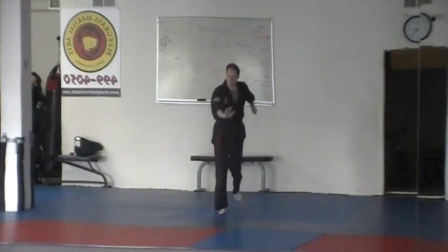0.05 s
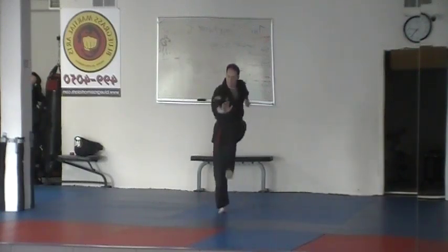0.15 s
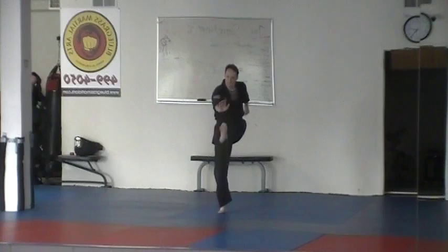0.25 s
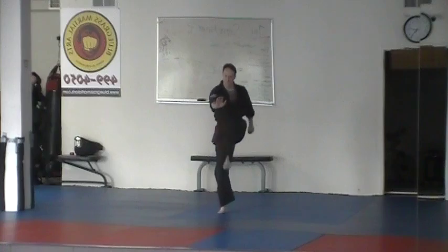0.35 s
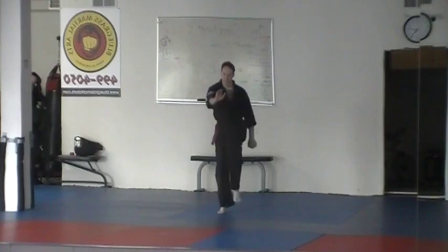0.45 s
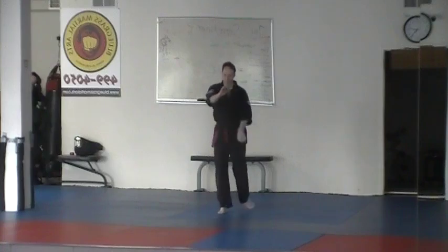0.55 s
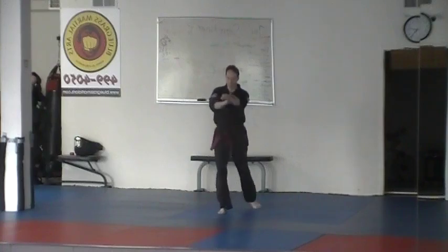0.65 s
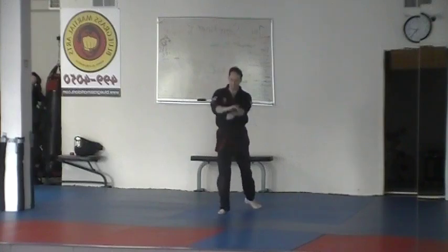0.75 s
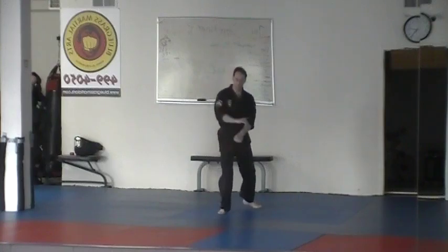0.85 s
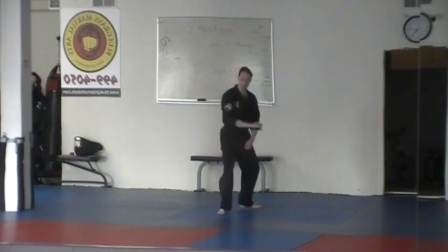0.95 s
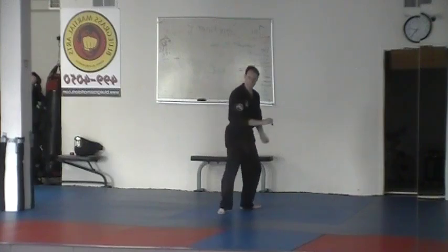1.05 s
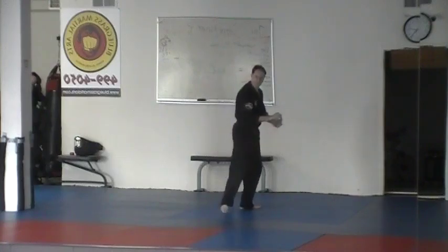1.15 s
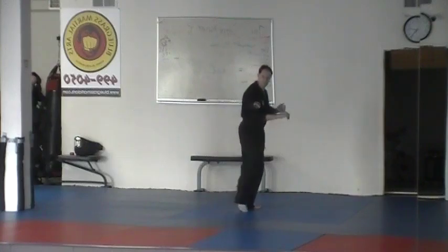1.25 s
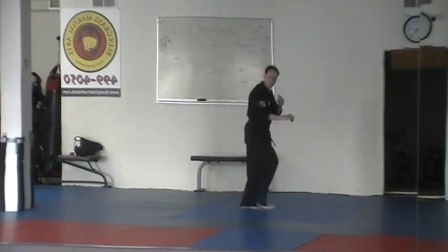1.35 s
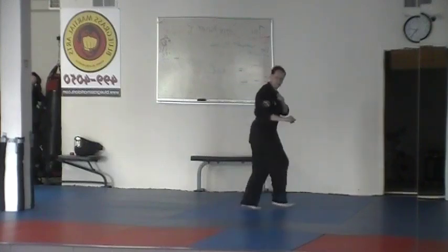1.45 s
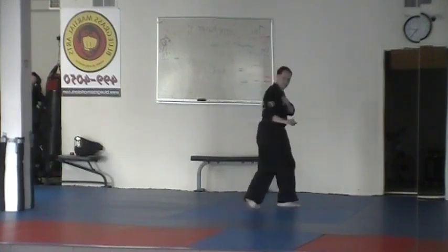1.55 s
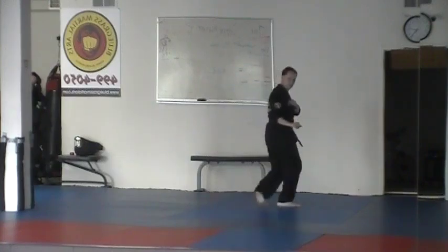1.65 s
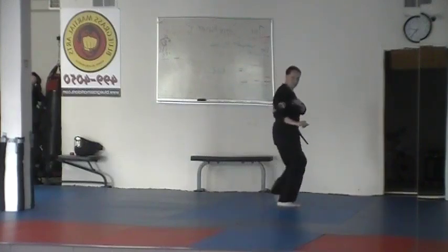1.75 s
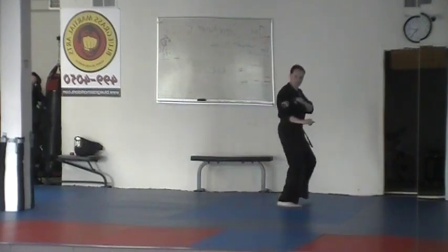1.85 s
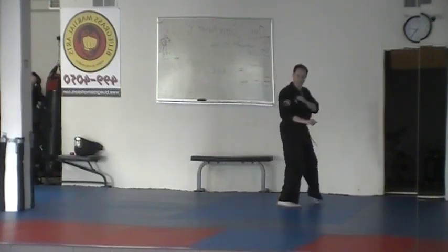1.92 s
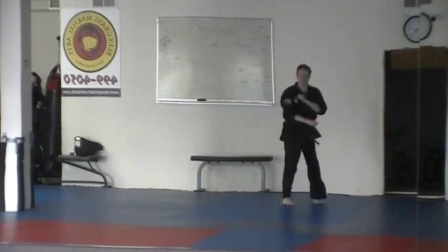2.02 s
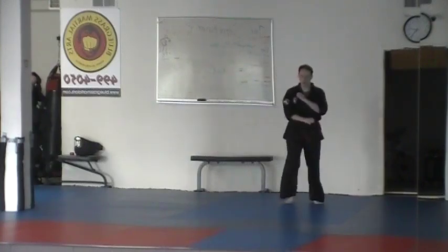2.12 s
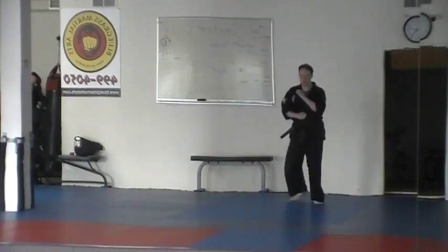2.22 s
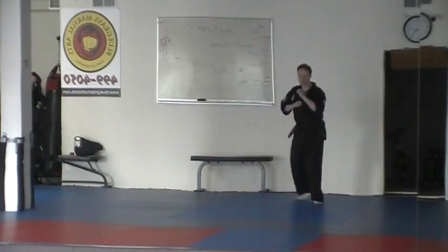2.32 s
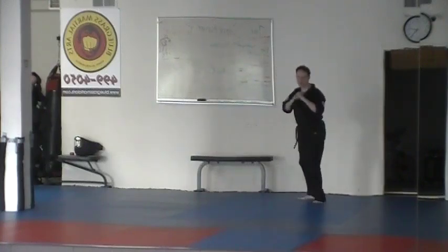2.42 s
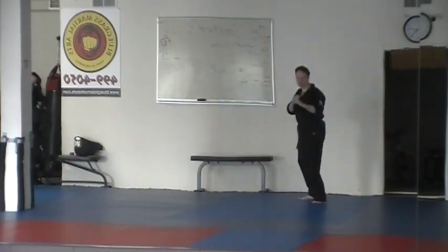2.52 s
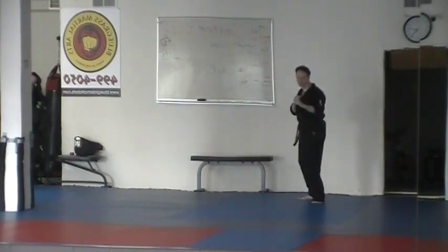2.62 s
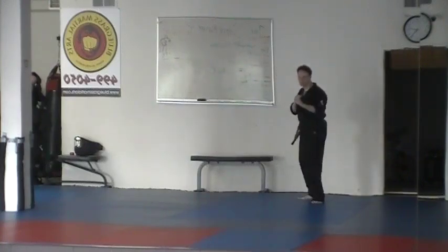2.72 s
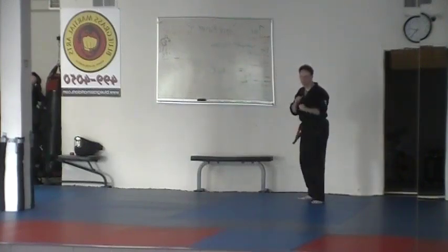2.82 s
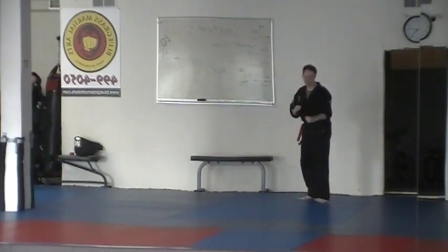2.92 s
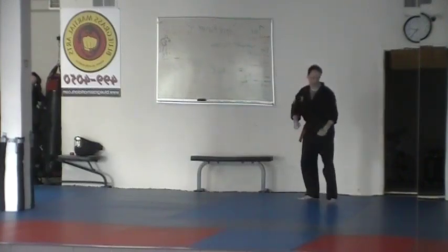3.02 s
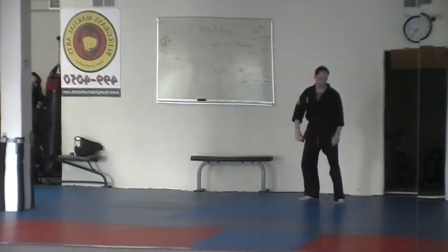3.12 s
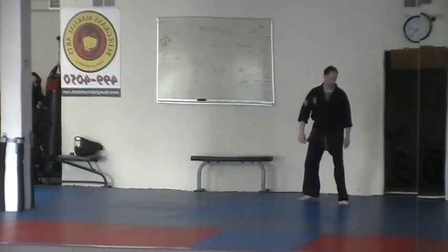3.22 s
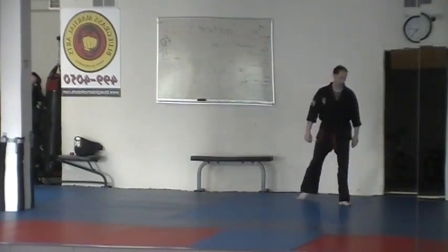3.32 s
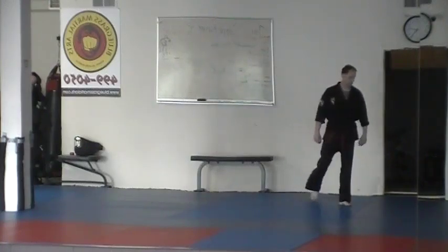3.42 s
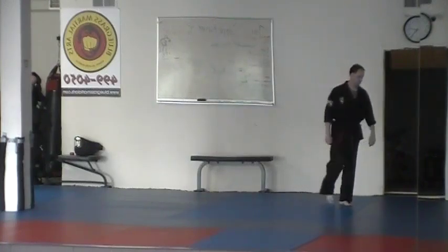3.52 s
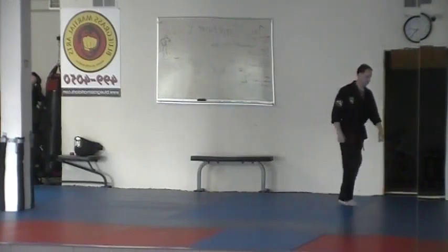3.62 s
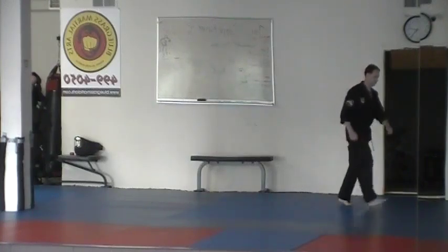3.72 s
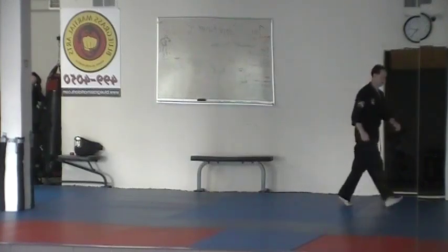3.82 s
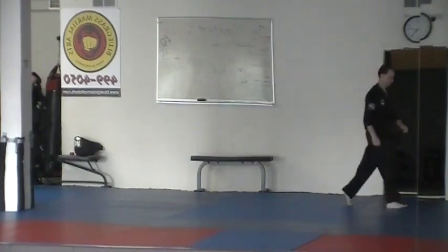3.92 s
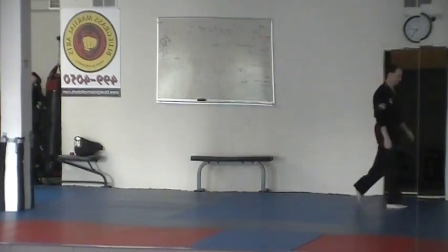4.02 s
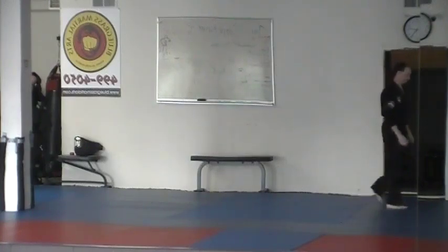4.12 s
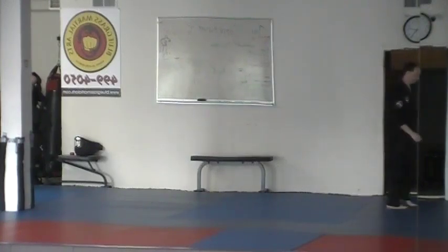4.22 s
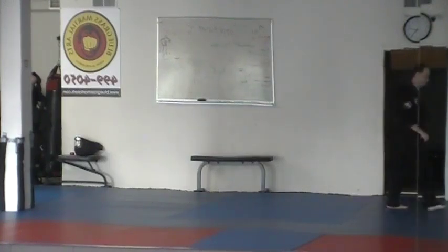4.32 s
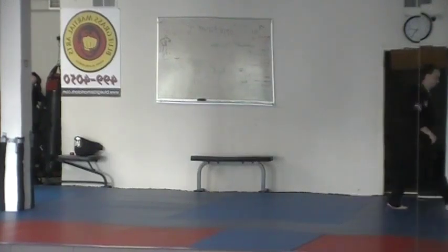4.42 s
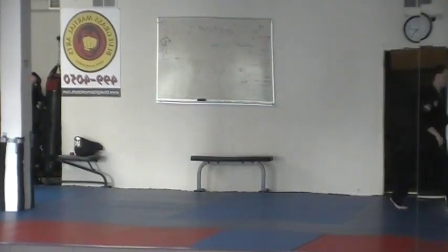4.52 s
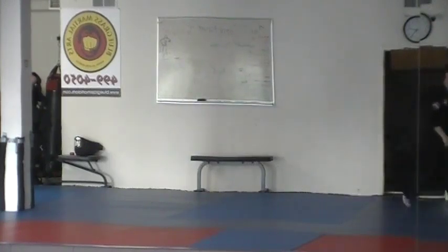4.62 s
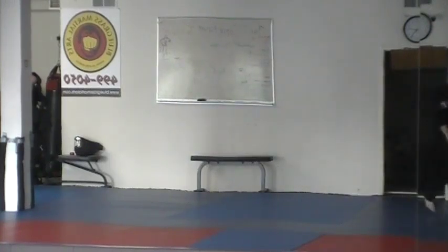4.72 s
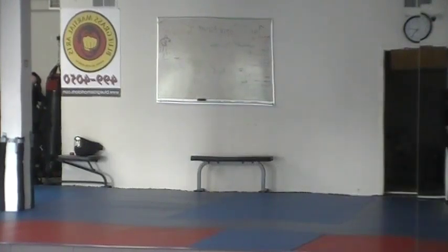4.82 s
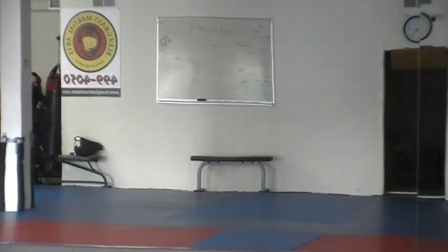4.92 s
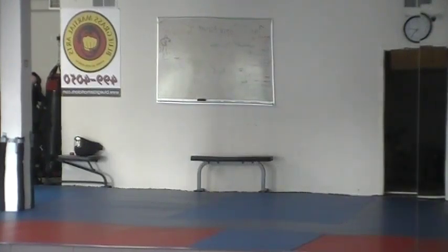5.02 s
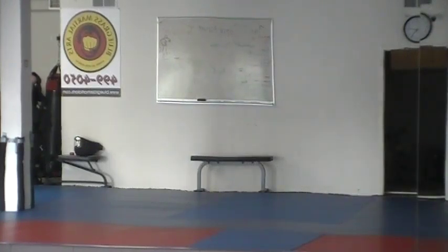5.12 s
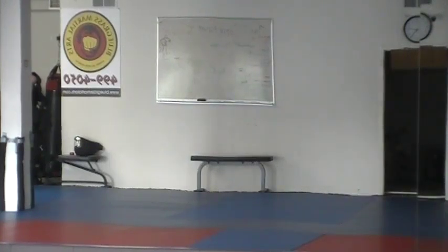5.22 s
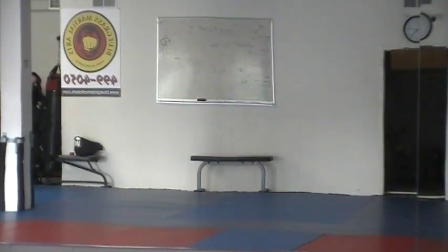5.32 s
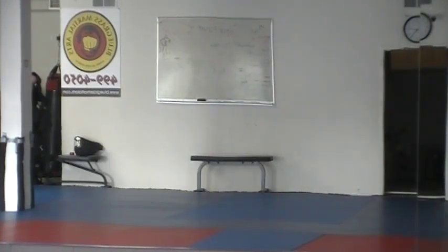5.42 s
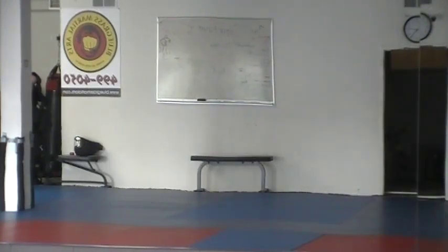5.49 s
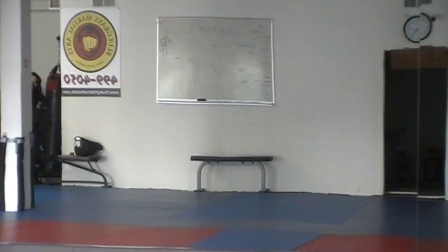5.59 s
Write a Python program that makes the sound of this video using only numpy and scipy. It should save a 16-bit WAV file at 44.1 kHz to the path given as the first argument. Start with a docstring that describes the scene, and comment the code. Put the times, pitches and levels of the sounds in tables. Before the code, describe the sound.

In a slightly echoing training hall with humming ventilation, cloth swishes softly before a single bright slap, by far the loudest sound, makes the microphone level duck for a moment. Two hissing slides follow as bare feet turn on a foam mat, the first with a sleeve snap and a tiny squeak. After that come only faint, scattered scuffs, ticks and soft pats of someone walking off.

```python
"""Barefoot martial arts drill

In a hard-walled hall with humming ventilation, a cotton uniform rustles through a kick and one sharp
slap cracks. Bare soles hiss round in two pivots on a vinyl-covered foam mat, then light steps scuff and
pat away. Automatic gain control turns everything down for a moment after the slap."""
import sys
import numpy as np
from scipy import signal
from scipy.fft import rfft, irfft
from scipy.io import wavfile
from scipy.ndimage import uniform_filter1d, minimum_filter1d

SR = 44100
rng = np.random.default_rng(int(sys.argv[2]) if len(sys.argv) > 2 else 0)


def inscribe(sig):
    """Save sig as 16-bit PCM at rate SR to the path in sys.argv[1].

    A 1-D sig is mono; a 2-D sig holds one channel per row.
    Samples are clipped to [-1, 1] before scaling.
    """
    pcm = np.round(np.clip(np.atleast_2d(sig).T, -1, 1) * 32767)
    wavfile.write(sys.argv[1], SR, pcm.astype(np.int16))


N = 249284

# the fine hiss of skin sliding on vinyl: (frequency [Hz], level [dB])
HISS_SPECTRUM = [(100, -62), (1000, -38), (3000, -16.5), (5500, -12), (7000, -7), (8600, -2), (10200, 0),
                 (12000, -3), (13500, -8.5), (15700, -17.5)]
# the lower, rougher sound of hard rubbing: (frequency [Hz], level [dB])
RASP_SPECTRUM = [(40, -48), (150, -33), (400, -3.5), (900, -10.5), (1500, -1), (2200, 2), (3500, 1.5),
                 (5000, 2), (8000, -3.5), (16000, -39)]
# the dull pat of the foam mat: (frequency [multiple of its pitch], level [dB])
MAT_SPECTRUM = [(.15, -33.5), (.45, -19.5), (.75, -5), (1, 4), (1.3, -3), (1.9, -19), (3.5, -9.5), (7, -29),
                (30, -66)]
# feet landing on the mat: (time [s], relative pat level [dB], pat pitch [Hz], skid level [dB])
LANDINGS = [(.111, -41, 686, -61), (.213, -44, 483, -46.5), (1.922, -45.5, 373, -45),
            (3.349, -48.5, 387, -53), (3.872, -51.5, 375, -57), (3.905, -44.5, 402, -45),
            (4.521, -45, 404, -49), (4.561, -44.5, 690, -54), (5.094, -41, 480, -46)]


def amp(db):
    """Turn decibels into a factor to multiply by."""
    return 10 ** (np.asarray(db) / 20)


def unit(x):
    """Scale a signal to an average power of 1."""
    return x / np.sqrt(np.mean(x ** 2) + 1e-20)


def value_at(points, hz):
    """Look up a table's value at hz, on a log-frequency axis."""
    freqs, values = np.transpose(points)
    return np.interp(np.log(hz + 1), np.log(freqs + 1), values)


def add(mix, start_s, sound):
    """Mix a sound in at its start time."""
    part = mix[max(round(start_s * SR), 0):][:len(sound)]
    part += sound[:len(part)]


def colour(x, spectrum, tilt_db=0, size=2048):
    """Give x the tone of a spectrum, tilted by tilt_db per octave; the filter has an energy of 1."""
    hz = abs(np.fft.fftfreq(size, 1 / SR))
    log_gain = np.log(amp(value_at(spectrum, hz) + tilt_db * np.log2(hz + 1)))
    ring = np.fft.ifft(np.exp(np.conj(signal.hilbert(log_gain)))).real  # rings after a hit, not before
    return signal.fftconvolve(x, ring / np.linalg.norm(ring))[:N]


def drift(n, hz):
    """A random wobble of about size 1 that turns hz times a second."""
    position = np.arange(n) * hz / SR
    return np.interp(position, np.arange(N // 10), rng.standard_normal(N // 10))


def grains(n, per_s, spread_db):
    """Rubbing surfaces catch and let go, making tiny clicks of uneven size."""
    chance, size, sign = rng.random(n), rng.standard_normal(n), rng.choice([-1, 1], n)
    return unit((chance < per_s / SR) * sign * amp(spread_db * np.clip(size, -2, 2)))


def burst(length_s, passes=6):
    """A brief contact: noise with its energy spread evenly over all frequencies."""
    window = signal.windows.tukey(max(round(length_s * SR), 10), .4)
    noise = rng.standard_normal(len(window))
    for _ in range(passes):
        phases = np.angle(rfft(noise * window, 2 * len(noise)))
        noise = irfft(np.exp(1j * phases))[:len(noise)]
    return unit(noise * window)


def sweep(length_s, swell_db, peak_s, fade_db_per_s, contact_s=.0098, release_share=.23):
    """The loudness of one limb movement: it starts quickly, swells to a peak, fades and lets go."""
    t = np.arange(0, length_s, 1 / SR)
    db = -swell_db * np.maximum(1 - t / peak_s, 0) - fade_db_per_s * np.maximum(t - peak_s, 0)
    return amp(db) * np.minimum(t / contact_s, 1) * np.minimum((1 - t / length_s) / release_share, 1)


def rub(strokes, rasp_tilt_db=0):
    """Short rubs on the mat, part hiss and part rasp, that catch quickly and let go."""
    hiss, rasp = np.zeros((2, N))
    for start, db, length, rasp_share in strokes:
        n = round(length * SR)
        loudness = amp(db) * np.interp(np.linspace(0, 1, n), [0, .08, .7, 1], [.83, .87, .67, .41])
        add(hiss, start, np.sqrt(1 - rasp_share) * loudness * grains(n, per_s=12000, spread_db=5.3))
        add(rasp, start, np.sqrt(rasp_share) * loudness * grains(n, per_s=2500, spread_db=5.4))
    return colour(hiss, HISS_SPECTRUM) + colour(rasp, RASP_SPECTRUM, rasp_tilt_db)


def ventilation(air_db=-56.5, waver_db=2.0, wander_radians=.52):
    """Air rushes steadily while a motor hums with slightly wavering tones."""
    # moving air: (frequency [Hz], relative level [dB])
    air_spectrum = [(25, -32), (70, -26), (125, -15.5), (160, -14), (230, -5.5), (400, 0), (900, -1.5),
                    (1900, -4), (3000, -8), (5000, -11.5), (9500, -11), (15500, -19)]
    # the motor's tones: (frequency [Hz], level [dB])
    motor_tones = [(120, -85.5), (199, -81), (220, -81.5), (241, -74), (398.4, -69), (479, -74),
                   (792, -77.5), (844, -72.5), (963.6, -70.5), (1320, -75)]
    t = np.arange(N) / SR
    hum = np.zeros(N)
    for hz, db in motor_tones:
        height = np.sqrt(2) * amp(db + waver_db * drift(N, hz=3.06))
        hum += height * np.sin(2 * np.pi * hz * t + wander_radians * drift(N, hz=3.95))
    return amp(air_db) * colour(rng.standard_normal(N), air_spectrum) + hum


def hall(x, echo_db, floor_db, floor_delay_s=.003, far_walls_s=.03, early_db=-8):
    """Sound arrives directly, off the floor, then as echoes that thicken once the far walls answer."""
    # first echoes off the ceiling, walls and gear: (delay [s], relative level [dB], length [s])
    first_echoes = [(.0032, -13, 0.00065), (.009, -11.5, 0.0021), (.011, -17, 0.0043),
                    (.016, -15.5, 0.0045), (.025, -30, .005), (0.035, -19, .008)]
    # how the hall rings: (frequency [Hz], time to fade by 60 dB [s], relative level [dB])
    hall_bands = [(150, 0.57, -7), (499, 0.43, -2), (1210, 0.65, -3.5), (3200, 0.67, 1), (4850, 0.7, -1),
                  (7100, 0.65, 1), (11000, 0.52, 1), (15900, .38, 1.5)]
    t = np.arange(SR) / SR
    hz, frame_s, noise_bands = signal.stft(rng.standard_normal(SR), SR, nperseg=256)
    fade_s = value_at([(f, seconds) for f, seconds, _ in hall_bands], hz)[:, None]
    tail = signal.istft(noise_bands * amp(-60 * frame_s / fade_s), SR, nperseg=256)[1][:SR]
    tail *= amp(early_db * (t < far_walls_s)) * (t > floor_delay_s)
    walls = amp(echo_db) * tail / np.linalg.norm(tail)
    for delay, db, length in first_echoes:
        scatter = burst(length)
        add(walls, delay, amp(db) * scatter / np.linalg.norm(scatter))
    response = colour(walls, [(f, db) for f, _, db in hall_bands])  # mats and walls soak up the lows
    response[0] += 1  # the direct sound
    add(response, floor_delay_s, amp([floor_db]))
    return signal.fftconvolve(x, response)[:N]


def uniform_rustle(gain_db=-5, flap_db=.5):
    """Folds of heavy cotton buckle in clumps as the limbs swing."""
    # limb swings: (time [s], length [s], swell [dB], relative level [dB], peak after [s])
    swings = [(0, 0.29, -4, -43.5, 0.016), (.2, 0.17, -5, -47, .015), (.47, 0.21, 3, -50, 0.19),
              (1.32, 0.18, 2, -43, 0.05)]
    # rustling cotton: (frequency [Hz], level [dB])
    cotton_spectrum = [(40, -56), (100, -26), (250, -9), (480, -0.5), (750, -2), (1200, -2.5), (2200, -6),
                       (4000, -15.5), (10000, -8.5), (16000, -23)]
    out = np.zeros(N)
    for start, length, swell_db, db, peak_s in swings:
        swing = sweep(length, swell_db, peak_s, fade_db_per_s=29)
        n = len(swing)
        flapping = amp(db + gain_db + flap_db * drift(n, hz=90))
        add(out, start, swing * flapping * grains(n, per_s=4000, spread_db=5.7))
    return colour(out, cotton_spectrum)


def sleeve_snaps():
    """A loose sleeve is jerked tight at the end of a strike and cracks."""
    # cracks of the sleeve: (time [s], level [dB])
    snaps = [(1.3714, -32), (1.3776, -34)]
    out = np.zeros(N)
    for start, db in snaps:
        add(out, start, amp(db) * burst(length_s=.004))
    return colour(out, RASP_SPECTRUM, tilt_db=-2)


def foot_pats(gain_db=-2, pat_s=.015):
    """A foot presses into the foam with a soft pat, lower for a flatter foot."""
    out = np.zeros(N)
    for time, db, hz, _ in LANDINGS:
        push = burst(pat_s)
        push *= amp(db + gain_db) * np.exp(-np.linspace(0, 1, len(push)))
        pat = colour(push, np.array(MAT_SPECTRUM) * [hz, 1])
        add(out, time - pat_s / 6, pat)  # each pat begins a moment before its listed time
    return out


def landing_skids(length_s=.016, rasp_share=.39):
    """Each landing foot skids a little as it settles."""
    return rub([(start, db, length_s, rasp_share) for start, _, _, db in LANDINGS])


def scuffs():
    """Skin and hem brush briefly against the mat."""
    # light touches: (time [s], level [dB], length [s], share of rasp [0-1])
    touches = [(.002, -49, .03, 0.16), (.632, -44.5, .038, 0.35), (1.1535, -45, 0.0064, 0.13),
               (1.184, -41.5, 0.024, 0.3), (2.131, -18, .0081, .04), (2.872, -58, 0.022, 0.3),
               (2.929, -50.5, .016, 0), (3.842, -41.5, .0044, 0.23), (4.2195, -47, 0.0077, .45)]
    return rub(touches)


def strides(rasp_share=.29, repeat_lag_s=.0445, repeat_db=-5):
    """A walking sole skims the mat; a fainter hiss follows about 45 ms later, like a far-wall echo."""
    # skims of the sole: (time [s], level [dB], length [s])
    skims = [(4.271, -36.5, .028), (4.916, -34, 0.033), (5.4574, -36, 0.0093)]
    soles = [(start, db, length, rasp_share) for start, db, length in skims]
    repeats = [(start + repeat_lag_s, db + repeat_db, length, 0) for start, db, length in skims]
    return rub(soles + repeats, rasp_tilt_db=1.5)


def skin_ticks():
    """Bare skin ticks dryly and brightly on the vinyl, mostly as a foot lands."""
    # ticks of the sole: (time [s], level [dB], tilt towards the treble [dB per octave])
    ticks = [(2.419, -37, -1), (3.227, -48, -4), (4.5225, -35, -3), (4.563, -39, 5), (5.0874, -35.5, -2),
             (5.0965, -30, 0.5)]
    # skin ticking on vinyl: (frequency [Hz], level [dB])
    tick_spectrum = [(20, -67), (100, -31), (500, -4), (2200, 1.5), (6000, -1.5), (11000, 4), (16000, -22)]
    out = np.zeros(N)
    for start, db, tilt_db in ticks:
        add(out, start, colour(amp(db) * burst(length_s=.0016), tick_spectrum, tilt_db))
    return out


def squeaks(overtone_db=-7, pitch_wobble=.068):
    """Skin sticks and slips on the vinyl so regularly that it makes a tiny, unsteady tone."""
    # squeaks of the sole: (time [s], level [dB], length [s], pitch [Hz])
    chirps = [(0.081, -52.5, .012, 2200), (0.099, -52, 0.012, 2020), (1.634, -42.5, 0.017, 2158),
              (1.651, -50.5, 0.017, 3080), (3.53, -56, 0.053, 5500), (4.194, -51, .013, 938)]
    out = np.zeros(N)
    for start, db, length, hz in chirps:
        n = round(length * SR)
        pitch = hz * (1 + pitch_wobble * drift(n, hz=815))
        phase = 2 * np.pi * np.cumsum(pitch) / SR
        tone = np.sin(phase) + amp(overtone_db) * np.sin(2 * phase)
        add(out, start, amp(db) * unit(np.hanning(n) * tone))
    return out


def foam_twist(gain_db=-3, pitch_hz=410):
    """The standing foot drags the foam round in small jerks."""
    # turns of the foot: (time [s], length [s], swell [dB], relative level [dB], peak after [s])
    turns = [(1.031, 0.35, 13, -49.5, 0.28), (1.459, 0.13, 10, -52.5, 0.078),
             (2.297, 0.082, 0, -45.5, .015)]
    out = np.zeros(N)
    for start, length, swell_db, db, peak_s in turns:
        turn = sweep(length, swell_db, peak_s, fade_db_per_s=90)
        add(out, start, amp(db + gain_db) * turn * grains(len(turn), per_s=1500, spread_db=1.7))
    return colour(out, np.array(MAT_SPECTRUM) * [pitch_hz, 1])


def braking_stutter(start_s=1.615, every_s=.0245, slip_s=.016, first_db=-36, fade_db=1.7, rasp_share=.44):
    """As the first pivot ends, the sole catches and slips four times, each weaker than the last."""
    return rub([(start_s + k * every_s, first_db - k * fade_db, slip_s, rasp_share) for k in range(4)])


def sole_slides(hiss_gain_db=-2, rasp_gain_db=-4, judder_db=1.27):
    """Skin skates over the grain of the vinyl: speed makes it hiss, weight makes it rasp lower."""
    # sliding soles: (time [s], length [s], swell [dB], relative hiss level [dB], fastest after [s],
    # relative rasp level [dB], heaviest after [s], rasp tilt [dB per octave])
    slides = [(1.149, 0.5, 22, -25, 0.14, -34, .21, -1.2),
              (1.953, 0.092, 11.5, -40, 0.075, -48, 0.063, -3.5),
              (2.042, 0.18, 3, -23, 0.18, -31, 0.069, 1.8), (2.312, .1, 1, -37, 0.016, -42, .015, -0.5),
              (3.351, 0.12, 9, -43.5, 0.032, -49, 0.026, -2),
              (3.515, 0.078, 5, -45.5, 0.057, -50, .045, 3.5)]
    hiss, rasp = np.zeros((2, N))
    for start, length, swell_db, hiss_db, fastest_s, rasp_db, heaviest_s, tilt_db in slides:
        speed = sweep(length, swell_db, fastest_s, fade_db_per_s=54.5)
        weight = sweep(length, swell_db, heaviest_s, fade_db_per_s=96)
        n = len(speed)
        grip = amp(judder_db * drift(n, hz=200))
        fine = speed * grip * grains(n, per_s=12000, spread_db=4.3)
        coarse = weight * grip * grains(n, per_s=3000, spread_db=4.3)
        add(hiss, start, amp(hiss_db + hiss_gain_db) * fine)
        add(rasp, start, amp(rasp_db + rasp_gain_db) * colour(coarse, RASP_SPECTRUM, tilt_db))
    return colour(hiss, HISS_SPECTRUM) + rasp


def slap():
    """A hand cracks against the body and squeezes the air out."""
    # a graze, then the full hit: (time [s], level [dB], length [s])
    contacts = [(0.6524, -8, .0011), (0.6537, 6.5, 0.00115)]
    # the crack, with trapped air ringing near 3 kHz: (frequency [Hz], level [dB])
    slap_spectrum = [(40, -20), (300, -15.5), (750, -1.5), (1200, -9), (1750, -4.5), (2500, 3.5), (3150, 6),
                     (4400, -2.5), (5400, 0), (6600, 3), (9000, 4), (11400, 4), (13200, -2.5),
                     (16000, -8.5)]
    out = np.zeros(N)
    for start, db, length in contacts:
        add(out, start, amp(db) * burst(length))
    return colour(out, slap_spectrum)


def scene():
    """Mix the drill over the ventilation; each spot on the mat gets its own pattern of echoes."""
    strike = hall(slap(), echo_db=-13.5, floor_db=-13.5)
    turning = sole_slides() + foam_twist() + uniform_rustle() + sleeve_snaps()
    moved = np.interp(np.arange(N) / SR, [1.75, 1.95], [0, 1])  # to a new spot between the pivots
    pivots = sum(hall(turning * share, echo_db=-5.5, floor_db=-23) for share in (1 - moved, moved))
    skin = scuffs() + strides() + braking_stutter() + landing_skids() + skin_ticks() + squeaks()
    steps = hall(skin, echo_db=-5.5, floor_db=-26)
    pats = hall(foot_pats(), echo_db=.5, floor_db=-19)
    return (strike + pivots + steps + pats + ventilation())[None]


def record(dry, ceiling_db=-.5, recover_db_per_s=33, cutoff_hz=15850):
    """Gain control turns down just before a loud peak and recovers slowly; the highest treble is cut."""
    peak_db = 20 * np.log10(1e-9 - minimum_filter1d(-abs(dry[0]), size=130))
    recovery_db = np.arange(N) / SR * recover_db_per_s
    held_peak_db = np.maximum.accumulate(peak_db + recovery_db) - recovery_db
    excess_db = np.maximum(held_peak_db - ceiling_db, 0)
    turned_down = dry / amp(uniform_filter1d(excess_db, size=30))
    low_pass = signal.firwin(511, cutoff_hz, window=("kaiser", 9), fs=SR)
    return signal.oaconvolve(turned_down, low_pass[None], "same")


dry = scene()
out = record(dry)
inscribe(out)
```